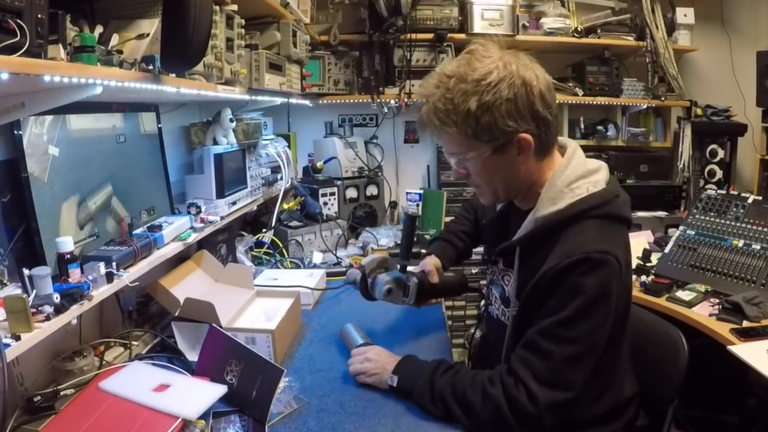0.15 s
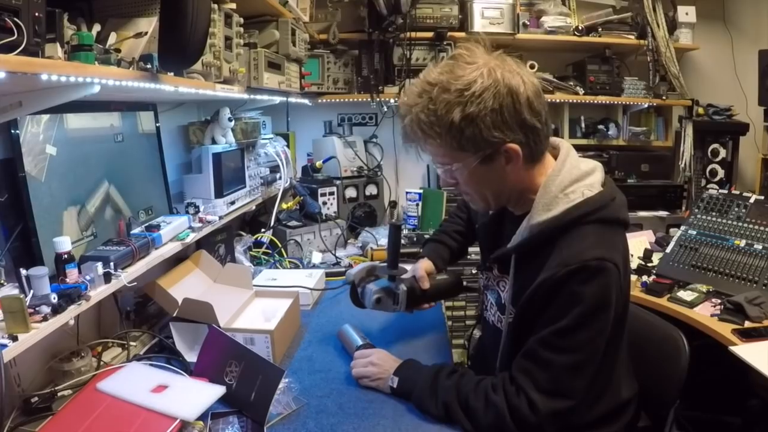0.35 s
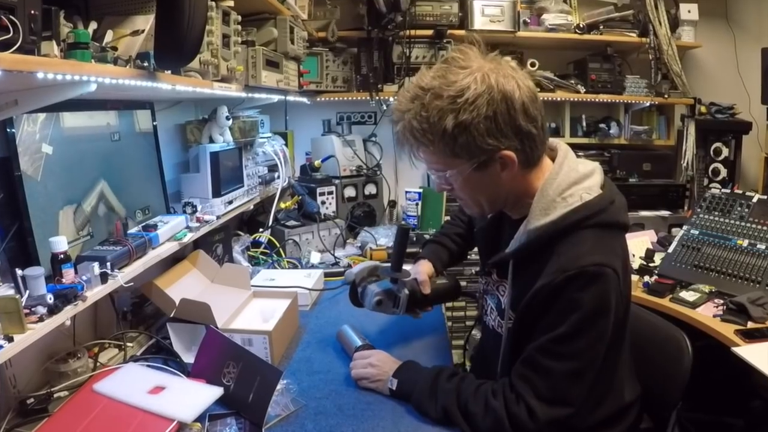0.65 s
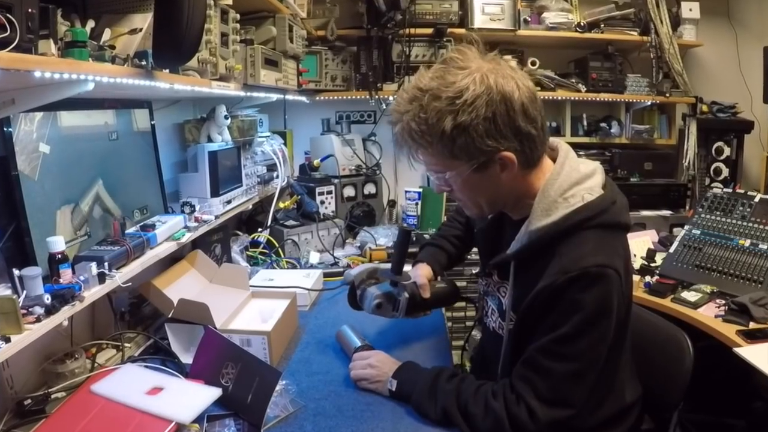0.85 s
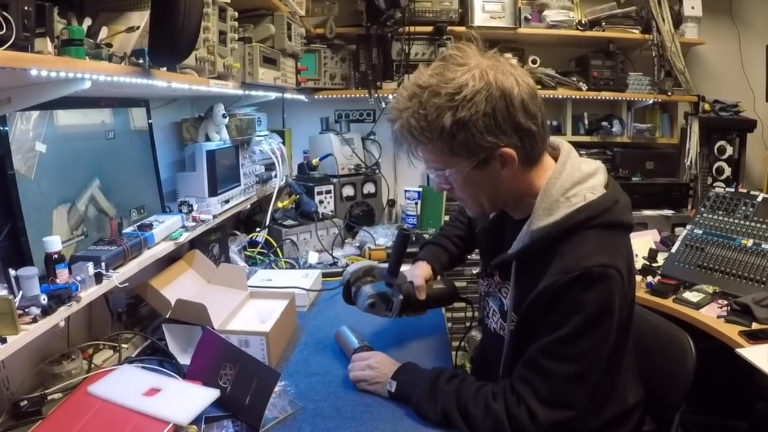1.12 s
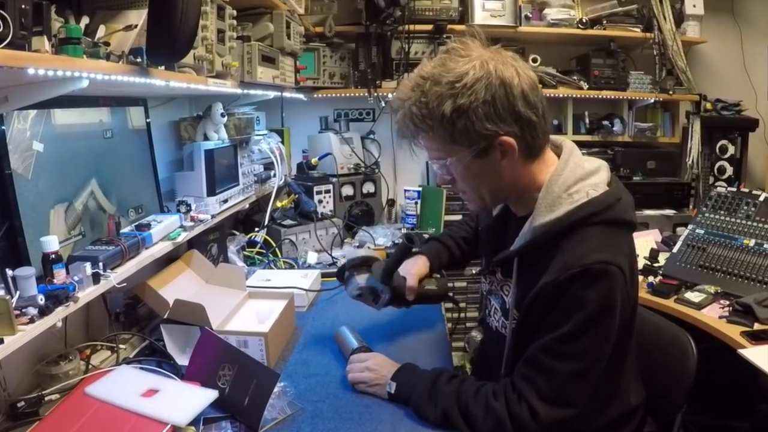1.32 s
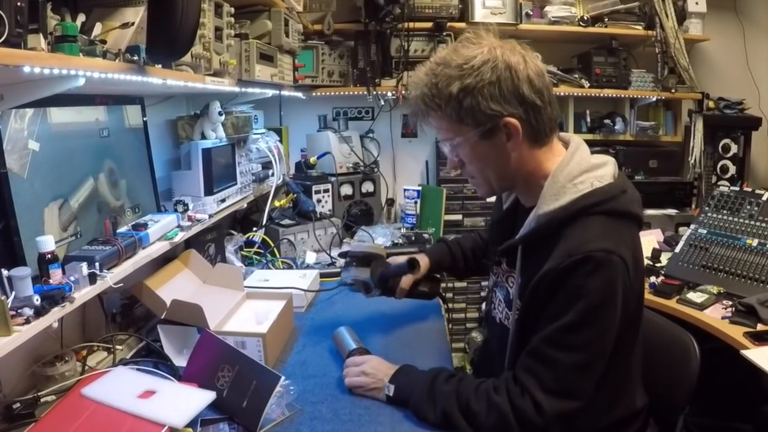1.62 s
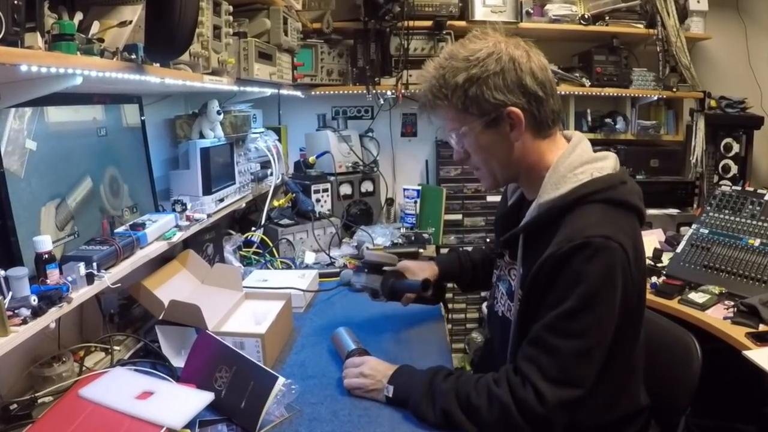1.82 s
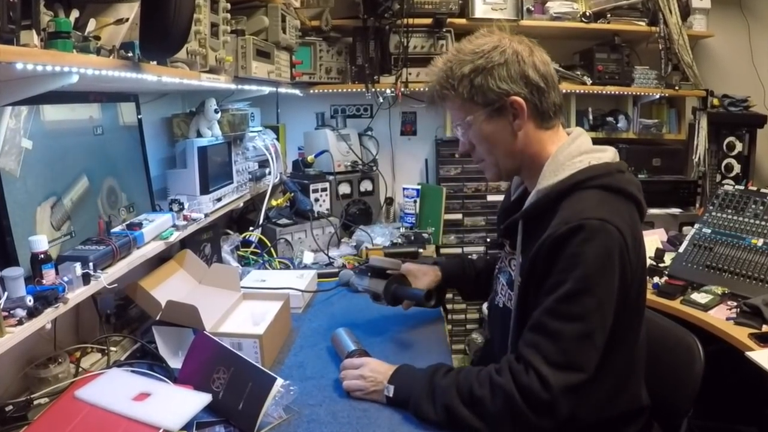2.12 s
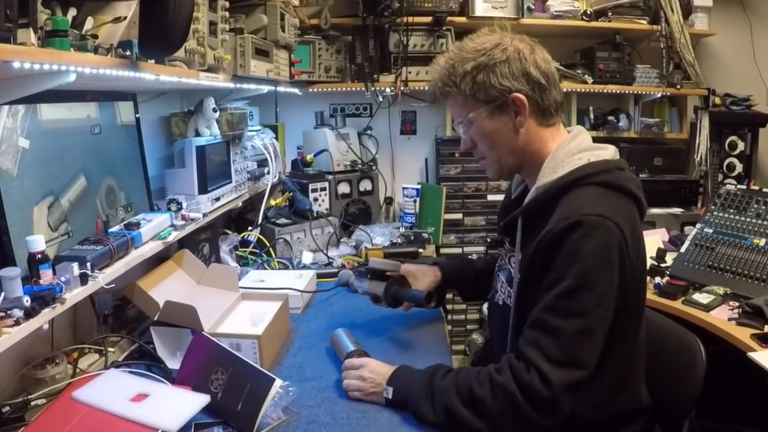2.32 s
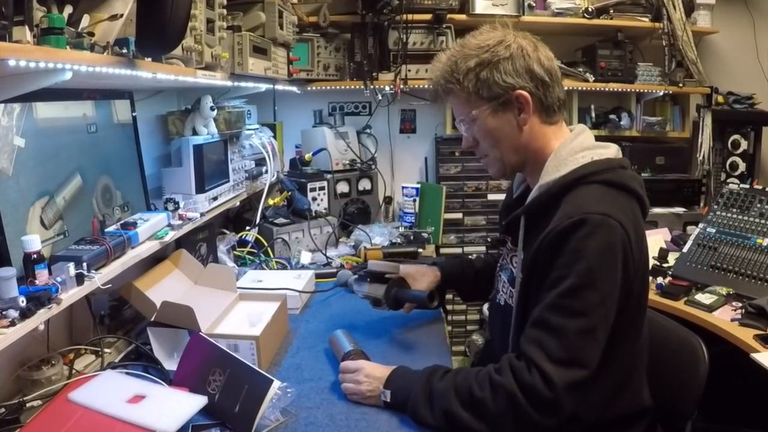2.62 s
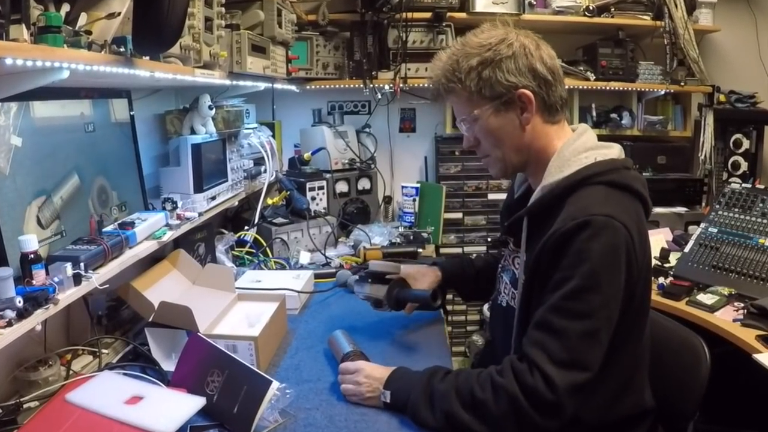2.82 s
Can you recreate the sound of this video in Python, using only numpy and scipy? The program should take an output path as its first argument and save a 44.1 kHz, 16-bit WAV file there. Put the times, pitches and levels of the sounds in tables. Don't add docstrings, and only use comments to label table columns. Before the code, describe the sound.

Electric angle grinder running free, humming and whistling over fan air; after switch-off the whine slides down, growing quieter while loose gears knock irregularly. Small, fairly dry workshop, single nearby microphone with very faint draught.

```python
import sys
import numpy as np
from scipy import signal
from scipy.io import wavfile
from scipy.ndimage import uniform_filter1d

SR = 44100
rng = np.random.default_rng(int(sys.argv[2]) if len(sys.argv) > 2 else 0)


def attenuation_scalar(level_db):
    decades = np.asarray(level_db, float) / 20
    return 10 ** decades


def materialize(psi):
    bounded = np.clip(np.atleast_2d(psi).T, -1, 1)
    quanta = np.round(bounded * 32767).astype(np.int16)
    wavfile.write(sys.argv[1], SR, quanta)


N = 130095

# time in seconds, turning rate in Hz, unbalance hum in dB.
ROTOR_SPEED = [(0.0, 546, -31.5), (0.06, 552, -31), (0.32, 560, -34.5), (0.42, 562.3, -32.5),
               (0.8, 567.6, -34), (0.89, 547, -34), (0.92, 542, -31.5), (1.12, 501.5, -35.5),
               (1.21, 484, -37), (1.31, 468.2, -33), (1.63, 414.1, -43.5), (1.96, 371, -49),
               (2.53, 300.5, -57.5), (2.6, 294, -63), (2.9, 260.9, -63), (2.95, 255.6, -68)]
# time in seconds, level in dB.
BLADE_WHISTLE = [(0, -42), (.29, -30), (.41, -42.5), (.77, -37.5), (.86, -49), (.98, -35.5), (1.23, -42),
                 (1.29, -56), (1.33, -43), (1.57, -42.5), (1.66, -58), (1.75, -52.5), (1.88, -49),
                 (2.05, -45.5), (2.1, -60), (2.14, -47.5), (2.37, -60), (2.58, -48.5)]
# time in seconds, level in dB.
WHISTLE_OCTAVE = [(0, -59), (.4, -54), (.85, -49), (.98, -59), (1.1, -53), (1.42, -64), (1.52, -68),
                  (2.3, -60), (2.6, -62)]
# multiple of the turning rate, level relative to the air in dB.
WEAK_ORDERS = [(5, -22), (6, -20), (11, -20), (13, -20), (23, -20), (36, -27)]
# time in seconds, air in dB, gear noise in dB,
# casing in dB, gear head turned to the microphone in dB.
TOOL_LEVELS = [(0.0, -41.5, -30.5, -43, -10), (0.08, -41.5, -40, -48.5, 2), (0.11, -41, -37, -43, -1),
               (0.27, -42, -52, -47, 10), (0.41, -42.5, -47.5, -45.5, 0.5), (0.77, -40.5, -43, -44, 1),
               (1.42, -46.5, -37.5, -47, -5.5), (1.68, -50.5, -36.5, -50, -16), (1.94, -51.5, -43, -51, -5),
               (2.28, -52.5, -50.5, -54.5, -3), (2.35, -53, -44, -51, -7.5), (2.38, -53.5, -51, -53, -3),
               (2.69, -54.5, -52.5, -54.5, -1.5), (2.76, -55, -53.5, -60, 1), (2.79, -55, -56.5, -55.5, 3),
               (2.95, -56.5, -52.5, -56.5, 2.5)]
# frequency in Hz, density in dB per Hz.
AIR_AT_FULL_SPEED = [(530, -33), (900, -6), (1410, -9), (2210, 1.5), (2670, -5), (6190, -0.5), (8120, -11),
                     (13700, -13), (15200, -21)]
# frequency in Hz, density in dB per Hz.
AIR_AT_LOWEST_SPEED = [(530, -59), (900, -0.5), (1240, -3.5), (1530, -5), (3190, 0.5), (4880, -0.5),
                       (7650, -7), (10800, -7.5), (15200, -16)]
# frequency in Hz, width in Hz, level in dB.
HOUSING_MODES = [(1225, 20, -5), (2120, 340, -10.5), (2940, 160, -2.5), (3210, 190, -12.5),
                 (4430, 640, -0.5), (5300, 210, -0.5), (6560, 250, -1)]
# frequency in Hz, width in Hz, level in dB.
TOOTH_MODES = [(2267.4, 490, -4.5), (3340, 1100, 3.5), (4570, 640, -0.5), (5750, 390, -10),
               (6619, 1000, -13.5)]
# time in seconds, peak level in dB.
BACKLASH_KNOCKS = [(1.3733, -25), (1.4202, -25), (1.4451, -14.5), (1.4848, -16.5), (1.5244, -15),
                   (1.5694, -14), (1.6654, -19), (1.6909, -32), (1.7734, -23), (1.8347, -21), (1.8599, -20),
                   (1.9078, -25.5), (2.0192, -25), (2.0769, -23), (2.1061, -26), (2.126, -21.5),
                   (2.1839, -20.5), (2.245, -26), (2.388, -21), (2.5161, -21.5), (2.5314, -29),
                   (2.7626, -24), (2.816, -23.5), (2.837, -21), (2.8622, -22.5), (2.8666, -27),
                   (2.9104, -24), (2.9244, -24), (2.938, -22), (2.9454, -25)]
# frequency in Hz, width in Hz, level in dB.
CASING_MODES = [(618, 117, -1), (710, 86, -1), (865, 162, -6.5), (391, 620, -13.5)]
# time in seconds, level in dB.
DRAUGHT_LEVEL = [(0.0, -65), (0.32, -61.5), (0.39, -84), (0.5, -68), (0.57, -72), (0.59, -65.5),
                 (0.97, -73), (1.47, -99), (1.52, -77), (1.6, -97), (1.89, -93), (1.98, -103), (2.9, -104),
                 (2.95, -81)]
# time in seconds, level in dB, length in seconds.
DRAUGHT_PUFFS = [
    (1.28, -72, 0.036),
    (1.525, -79, .035),
    (1.575, -85, .03),
    (2.936, -85, .03),
]


def rms_one(x):
    return x / np.sqrt(np.mean(x ** 2) + 1e-20)


def in_time(rows):
    s, *columns = np.transpose(rows)
    return [np.interp(np.arange(N) / SR, s, c) for c in columns]


def at_hz(points, hz):
    table_hz, db = np.transpose(points)
    return np.interp(np.log(hz), np.log(table_hz), db)


def drift(rate_hz):
    r = np.exp(-80 * np.pi * rate_hz / SR)
    noise = rng.standard_normal(N // 40 + 2002)
    slow = signal.lfilter([1], [1, -2 * r, r * r], noise)[2000:]
    return np.interp(np.arange(N) / 40, np.arange(len(slow)), rms_one(slow - slow.mean()))


def band(x, low_hz, high_hz, order=2):
    edges_hz = [low_hz, min(high_hz, .45 * SR)]
    return signal.sosfilt(signal.butter(order, edges_hz, "band", fs=SR, output="sos"), x)


def resonate(x, modes):
    out = 0
    for k, (hz, width_hz, db) in enumerate(modes):
        r = np.exp(-np.pi * width_hz / SR)
        feed = [(1 - r * r) / 2, 0, (r * r - 1) / 2]
        poles = [1, -2 * r * np.cos(2 * np.pi * hz / SR), r * r]
        out = out + (-1) ** k * attenuation_scalar(db) * signal.lfilter(feed, poles, x)
    return out


def rotor_tones(air_db):
    speed, hum_db = in_time(ROTOR_SPEED)
    speed = uniform_filter1d(speed, size=2000, mode="nearest") * (1 + 0.00029 * drift(15))
    angle = 2 * np.pi * np.cumsum(speed) / SR

    out = attenuation_scalar(hum_db + 0.5 * drift(8.2)) * np.sin(angle)

    whistle, = in_time([(s, attenuation_scalar(db)) for s, db in BLADE_WHISTLE])
    octave_db, = in_time(WHISTLE_OCTAVE)
    wobble_db, last_swell_db_per_s = 2, 10
    swell_db = last_swell_db_per_s * np.maximum(np.arange(N) / SR - BLADE_WHISTLE[-1][0], 0)
    out += whistle * attenuation_scalar(swell_db + wobble_db * drift(25)) * np.sin(12 * angle)
    out += attenuation_scalar(octave_db + wobble_db * drift(25)) * np.sin(24 * angle)

    highest_order_hz = 15500
    for multiple, db in WEAK_ORDERS:
        multiple = round(multiple)
        level = attenuation_scalar(air_db + db + 2.5 * drift(3.4))
        out += (multiple * speed < highest_order_hz) * level * np.sin(multiple * angle)
    return np.sqrt(2) * out, np.sin(2 * angle)


def cooling_air(air_db, patchy_db):
    speed, _ = in_time(ROTOR_SPEED)
    early_change = 0.29
    slow = ((speed.max() - speed) / (speed.max() - speed.min())) ** early_change
    edges_hz = 150 * 2 ** np.arange(0, 7, 1 / 3)
    white = rng.standard_normal((2, N))
    out = 0
    for k, (low, high) in enumerate(zip(edges_hz, edges_hz[1:])):
        hz = np.sqrt(low * high)
        db = (1 - slow) * at_hz(AIR_AT_FULL_SPEED, hz) + slow * at_hz(AIR_AT_LOWEST_SPEED, hz)
        db = db - 9 * max(np.log2(500 / hz), 0)
        out = out + attenuation_scalar(db + patchy_db * drift(3.6)) * band(white[k % 2], low, high)
    treble_power = uniform_filter1d(band(out, 7500, 13000, order=4) ** 2, size=9000, mode="reflect")
    return attenuation_scalar(air_db) * out / np.sqrt(treble_power)


def tooth_contacts(s, db):
    smear_s, spread_db = .0005, 1.8
    strength = rng.standard_normal((len(s), len(TOOTH_MODES)))
    delay = rng.standard_normal((len(s), len(TOOTH_MODES)))
    out = 0
    for k, (hz, width_hz, level_db) in enumerate(TOOTH_MODES):
        at = ((s + smear_s * np.tanh(delay[:, k])) * SR).astype(int)
        force = attenuation_scalar(db + level_db + spread_db * strength[:, k]) * (-1) ** k * np.sign(delay[:, 0])
        clicks = np.full(N, 1e-18)
        np.add.at(clicks, np.clip(at, 0, N - 1), force)
        mode = [(hz, width_hz, 0)]
        out = out + resonate(resonate(clicks, mode), mode) * SR / width_hz
    return out / 5


def bevel_gears(gear_db, facing_db):
    contacts_per_s, rattle_db = 150, -4.5
    draws = rng.random((int(contacts_per_s * N / SR), 2))
    rattle_force_db = 4 * np.minimum(-np.log(1 - draws[:, 1]), 3.5)
    rattle = rms_one(tooth_contacts(draws[:, 0] * N / SR, rattle_force_db))

    drive = rng.standard_normal(N)
    low = resonate(drive, HOUSING_MODES[:4])
    high = resonate(drive, HOUSING_MODES[4:])
    mesh = (low + attenuation_scalar(facing_db) * high) / np.std(low) + attenuation_scalar(rattle_db) * rattle

    s, db = np.transpose(BACKLASH_KNOCKS)
    knocks = tooth_contacts(s + .0004, db - 5.5)
    return attenuation_scalar(gear_db - 8 + drift(11)) * mesh + knocks


def hollow_casing(casing_db, second_order):
    boom = band(resonate(rng.standard_normal(N), CASING_MODES), 195, 850)
    lifted = band(second_order, 530, 680) * attenuation_scalar(-5 + 3.5 * drift(4.1))
    return attenuation_scalar(casing_db + 2) * (attenuation_scalar(0.5 * drift(30)) * rms_one(boom) + lifted)


def workshop(x):
    t60_s, tail_db, first_echo_s = 0.067, -18.5, .004
    t = np.arange(int(.3 * SR)) / SR
    tail = band(rng.standard_normal(len(t)), 290, 4700) * attenuation_scalar(-60 * t / t60_s) * (t > first_echo_s)
    return x + attenuation_scalar(tail_db) * signal.fftconvolve(x, tail / np.sqrt(np.sum(tail ** 2)))[:N]


def draught():
    level_db, = in_time(DRAUGHT_LEVEL)
    t = np.arange(N) / SR
    gain = attenuation_scalar(level_db + 2.8 * drift(12))
    for s, puff_db, length_s in DRAUGHT_PUFFS:
        gain = gain + attenuation_scalar(puff_db) * np.exp(-((t - s) / (0.33 * length_s)) ** 2)
    rumble = rms_one(band(rng.standard_normal(N), 11, 225))
    return band(gain * rumble, 25, 157)


def scene():
    air_db, gear_db, casing_db, facing_db = in_time(TOOL_LEVELS)
    tones, second_order = rotor_tones(air_db)
    tool = tones + cooling_air(air_db, patchy_db=1.5)
    tool = tool + workshop(bevel_gears(gear_db, facing_db))
    tool = tool + hollow_casing(casing_db, second_order)
    low_cut = signal.butter(4, 141, "high", fs=SR, output="sos")
    return np.tile(signal.sosfilt(low_cut, tool) + draught(), (2, 1))


def band_limit(x):
    return signal.sosfilt(signal.butter(12, 15350, fs=SR, output="sos"), x)


def record(dry):
    return band_limit(dry)


dry = scene()
out = record(dry)
materialize(out)
```